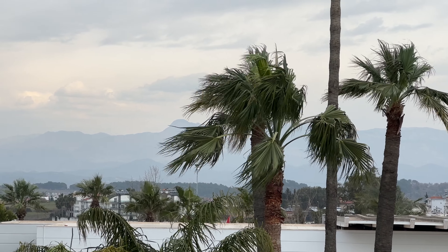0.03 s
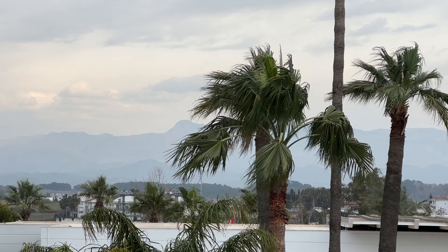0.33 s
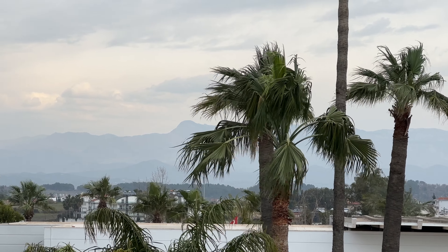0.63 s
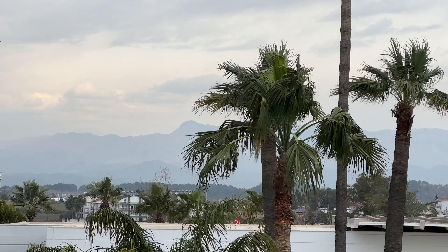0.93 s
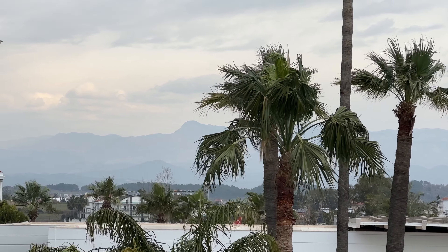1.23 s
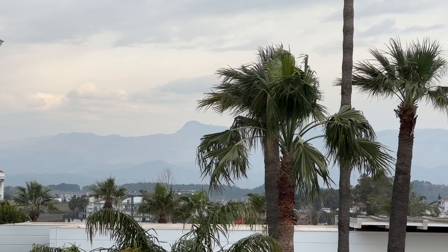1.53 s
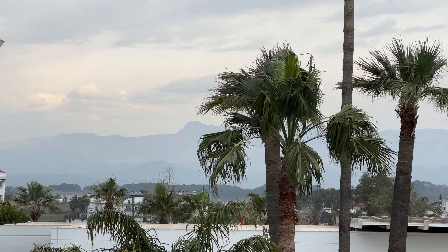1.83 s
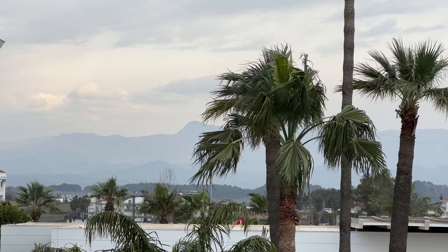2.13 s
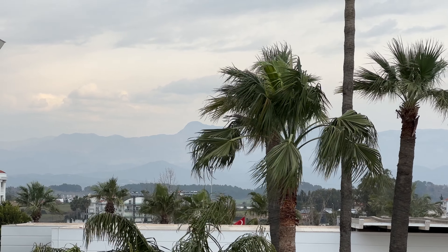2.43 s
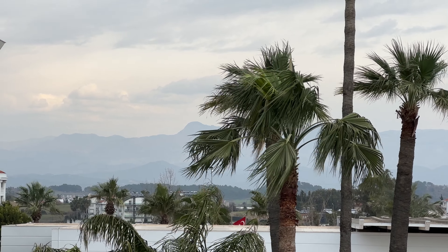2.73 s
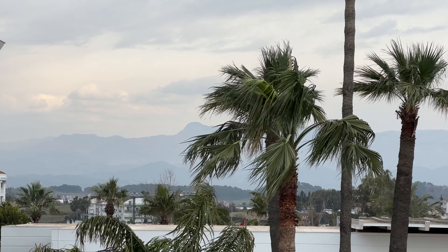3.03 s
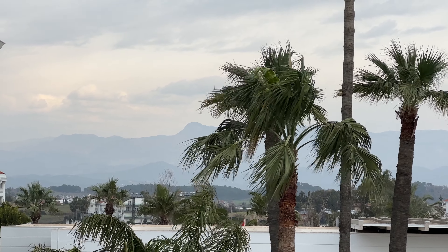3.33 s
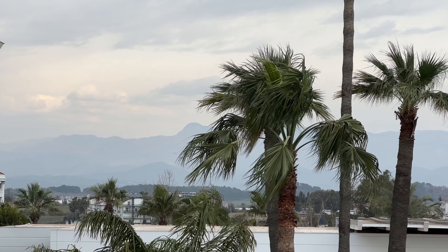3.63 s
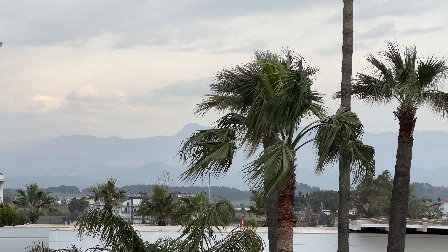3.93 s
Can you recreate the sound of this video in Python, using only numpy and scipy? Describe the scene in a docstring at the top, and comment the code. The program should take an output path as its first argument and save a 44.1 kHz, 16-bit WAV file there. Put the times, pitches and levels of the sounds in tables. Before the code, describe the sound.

Gusty wind rumbles and thumps on the microphone over the steady hiss of palm leaves.

```python
"""Low thumps and a gusty rumble come first: strong wind strikes an outdoor stereo microphone.
Turbulent pressure on its ports makes the rumble and a rougher flutter, and single eddies
hit them as short thumps that drop quickly in pitch. Behind this, palm crowns rush with
a steady wide hiss, and their stiff leaf tips tick faintly against each other."""
import sys
import numpy as np
from scipy import signal
from scipy.fft import rfft, irfft
from scipy.io import wavfile
from scipy.ndimage import uniform_filter1d

SR = 44100
rng = np.random.default_rng(int(sys.argv[2]) if len(sys.argv) > 2 else 0)


def master_out(mix):
    """Clip the mix to full scale and print it as 16-bit PCM to the path in sys.argv[1]."""
    frames = np.transpose(np.atleast_2d(mix))
    ceiling = np.clip(frames, -1, 1)
    pcm = np.round(ceiling * 32767).astype(np.int16)
    wavfile.write(sys.argv[1], SR, pcm)


N = 176400
ANTIPHASE = np.array([[1], [-1]])  # left and right with opposite signs


def gain(db):
    """Amplitude ratio of a level in decibels."""
    return 10 ** (np.asarray(db) / 20)


def curve(table, column=1):
    """Linear interpolation of one table column over time."""
    rows = np.array(table)
    return np.interp(np.arange(N) / SR, rows[:, 0], rows[:, column])


def colour(x, spectrum):
    """Spectral shaping: x filtered by a curve of (frequency [Hz], level [dB]), at rms 1."""
    hz, db = np.array(sorted(spectrum)).T
    bin_hz = np.maximum(np.fft.rfftfreq(N, 1 / SR), 1)
    response = gain(np.interp(np.log(bin_hz), np.log(hz), db))
    shaped = irfft(rfft(x) * response, N)
    return shaped / np.std(shaped)


def noise(spectrum):
    """Filtered Gaussian noise at rms 1."""
    return colour(rng.standard_normal(N), spectrum)


def wander(rate_hz):
    """Random modulation: smoothed noise of spread 1 that changes about rate_hz times a second."""
    width = max(int(SR / rate_hz), 2)
    drift = rng.standard_normal(N)
    for _ in range(2):
        drift = uniform_filter1d(drift, width, mode="wrap")
    return drift / np.std(drift)


def add(out, start_s, sound):
    """Superposition: a short stereo sound is summed into out."""
    start = int(np.clip(start_s * SR, 0, N - 1))
    out[:, start:start + sound.shape[1]] += sound[:, :N - start]


# Spectrum of a leaf tap (frequency [Hz], relative level [dB])
TICK_SPECTRUM = [(800, -55), (2500, 0), (6500, 3), (8000, -9), (9500, -3), (12000, -22), (16000, -24)]


def leaf_ticks(ticks_per_s=40, scatter_db=4.5, decay_s=0.0057, level_db=-70):
    """Impact noise: leaf tips collide at random, each tap a burst that decays exponentially."""
    taps = (rng.random(N) < ticks_per_s / SR) * gain(scatter_db * rng.standard_normal(N))
    envelope = signal.lfilter([1], [1, -np.exp(-1 / (decay_s * SR))], taps)
    return gain(level_db) * colour(envelope * rng.standard_normal(N), TICK_SPECTRUM)


# Spectra of the rush: direct, diffuse, from trees on the left (frequency [Hz], relative level [dB])
DIRECT_SPECTRUM = [(100, 4.5), (400, 10), (700, 6.5), (1000, 4), (1400, 3), (2000, 0), (3600, -2.5),
                   (4300, -5.5), (4900, -8.5), (6200, -8), (8300, -7.5), (9400, -8), (10000, -13.5),
                   (10600, -21), (12000, -25), (15600, -24.5)]
DIFFUSE_SPECTRUM = [(100, 0), (400, 4.5), (750, 6), (1050, 0.5), (1400, -6), (2100, -27), (2900, -14.5),
                    (4500, -21.5), (5800, -38), (7400, -28), (8250, -58), (9200, -11), (10200, -27),
                    (11500, -50), (14500, -31)]
LEFT_TREES_SPECTRUM = [(300, -40), (700, -17), (1100, 4.5), (1500, -3), (2200, -53)]
# Envelope of the direct rush (time [s], level [dB])
RUSH_LEVEL = [(0, -48.5), (.5, -49), (.8, -48.1), (1.1, -49.5), (1.35, -49.7), (1.7, -47), (1.95, -47.5),
              (2.2, -49.5), (2.7, -47.5), (3.2, -49), (3.6, -48.5), (4, -48)]


def fronds(flicker_db=0.64, swell_db=0.43, diffuse_db=-54.5, left_trees_db=-58.5):
    """Flow noise in palm crowns: each octave flickers by itself, and the whole rush swells together."""
    spectrum = rfft(noise(DIRECT_SPECTRUM))
    octave = np.log2(np.clip(np.fft.rfftfreq(N, 1 / SR), 500, 16000) / 500)
    direct = np.zeros(N)
    for centre in range(6):
        band = irfft(spectrum * np.maximum(1 - abs(octave - centre), 0), N)
        direct += band * gain(flicker_db * wander(rate_hz=12))
    diffuse = ANTIPHASE * gain(diffuse_db) * noise(DIFFUSE_SPECTRUM)
    rush = direct * gain(curve(RUSH_LEVEL)) + diffuse
    rush[0] += gain(left_trees_db) * noise(LEFT_TREES_SPECTRUM)
    return rush * gain(swell_db * wander(rate_hz=2.1))


# Spectra of the turbulent pressure (frequency [Hz], relative level [dB])
RUMBLE_SPECTRUM = [(15, -41), (30, -18), (45, -5), (65, 2.5), (95, -7.5), (130, -9), (200, -15.5),
                   (400, -30.5), (900, -111)]
FLUTTER_SPECTRUM = [(80, 3.5), (160, -6), (280, 0), (450, -5), (700, -6.5), (1000, -17.5), (1600, -26),
                    (3000, -68)]
# Wind at the microphone
# (time [s], relative rumble level [dB], relative flutter level [dB], typical small-eddy pitch [Hz])
GUSTS = [(0, -37.5, -40.5, 406), (.1, -30, -46, 398), (.24, -30.5, -43.5, 402), (.37, -39, -40.5, 507),
         (.5, -34, -41, 550), (.7, -35, -40.5, 595), (.9, -39.5, -42.5, 786), (1.1, -37.5, -44, 875),
         (1.4, -38.5, -43, 1020), (1.6, -39, -44, 1160), (1.7, -38, -43, 1230), (1.8, -38.5, -44, 1130),
         (2.22, -42.5, -46.5, 1060), (2.6, -46.5, -45.5, 885), (2.9, -46, -52, 796), (3.1, -42, -45, 930),
         (3.45, -41, -43, 746), (3.65, -43, -44, 724), (4, -39, -47, 800)]


def buffeting(rumble_rough_db=1.5, flutter_rough_db=2.5):
    """Turbulent pressure, partly coherent at the two ports: a deep rumble and a rougher flutter."""
    rumble = noise(RUMBLE_SPECTRUM) + ANTIPHASE * gain(-11.5) * noise(RUMBLE_SPECTRUM)
    flutter = noise(FLUTTER_SPECTRUM) + ANTIPHASE * gain(-8.5) * noise(FLUTTER_SPECTRUM)
    rumble_db = curve(GUSTS, column=1) + 1.73 + rumble_rough_db * wander(rate_hz=14.3)
    flutter_db = curve(GUSTS, column=2) - 4.5 + flutter_rough_db * wander(rate_hz=56)
    return rumble * gain(rumble_db) + flutter * gain(flutter_db)


def eddy(start_hz, end_hz, period_growth=0.59, port_spread_rad=0.3):
    """A falling chirp: a pressure ripple whose period grows linearly meets the two ports out of step."""
    duration_s = (1 / end_hz - 1 / start_hz) / period_growth
    t = np.arange(int(duration_s * SR)) / SR
    log_fall = np.log1p(period_growth * start_hz * t)  # log of start pitch over present pitch
    phase = 2 * np.pi * (log_fall / period_growth + rng.random())
    port_offset = ANTIPHASE * port_spread_rad * rng.uniform(-1, 1)
    progress = log_fall / np.log(start_hz / end_hz)
    envelope = abs(np.sin(np.pi * progress ** 0.85)) ** 1.28  # peaks early, with soft ends
    return envelope * np.sin(phase + port_offset)


def small_eddies(eddies_per_s=65, above_flutter_db=6, scatter_db=2):
    """Fine-scale turbulence: many short ripples at random times follow the level of the flutter."""
    out = np.zeros((2, N))
    flutter_db, pitch_hz = curve(GUSTS, column=2), curve(GUSTS, column=3)
    for onset in rng.integers(N, size=int(eddies_per_s * N / SR)):
        start_hz = pitch_hz[onset] * 2 ** rng.uniform(-0.5, 0.5)
        level_db = flutter_db[onset] + above_flutter_db + rng.uniform(-scatter_db, scatter_db)
        add(out, onset / SR, gain(level_db) * eddy(start_hz, start_hz / 5))
    return out


# Strong eddies at the ports (time [s], relative peak level [dB], start pitch [Hz], end pitch [Hz])
STRONG_EDDIES = [(.015, -28, 226, 38), (.043, -23, 149, 36), (.051, -32, 597, 43), (.089, -23, 760, 60),
                 (.094, -19.5, 145, 35), (.132, -25.5, 219, 47), (.159, -22, 149, 36),
                 (.174, -28.5, 520, 58), (.275, -14.5, 402, 40), (.288, -13.5, 150, 37.5),
                 (.337, -23, 300, 87), (.43, -29.5, 453, 75), (.452, -28, 520, 173),
                 (.542, -23.5, 950, 130), (.551, -21, 690, 114), (.642, -27, 299, 100),
                 (.663, -24.5, 597, 142), (.672, -22.5, 300, 62), (.774, -28.5, 394, 94),
                 (.788, -27.5, 650, 142), (.886, -31.5, 715, 163), (.898, -36, 1000, 200),
                 (1.005, -34, 800, 180), (1.017, -26, 497, 151), (1.026, -26, 895, 216),
                 (1.076, -33, 788, 88), (1.081, -27.5, 840, 250), (1.097, -29, 905, 216),
                 (1.163, -27.5, 520, 87), (1.208, -22, 1120, 172), (1.249, -38, 1690, 300),
                 (1.299, -35, 900, 230), (1.345, -26, 940, 139), (1.374, -23.5, 197, 66),
                 (1.416, -31.5, 1040, 116), (1.43, -28.5, 653, 199), (1.593, -28.5, 1195, 284),
                 (1.649, -34, 1000, 150), (1.662, -36, 1372, 457), (1.667, -29.5, 686, 163),
                 (1.678, -27.5, 1030, 248), (1.684, -26.5, 149, 36), (1.694, -36, 1500, 263),
                 (1.731, -26, 1220, 171), (1.826, -25.5, 240, 65), (1.845, -36, 1100, 250),
                 (1.927, -27.5, 1040, 248), (2.023, -31.5, 1100, 260), (2.099, -36.5, 1060, 300),
                 (2.183, -30, 945, 302), (2.2, -32, 141, 42), (2.257, -31.5, 200, 60),
                 (2.358, -29, 900, 340), (2.368, -31, 131, 40), (2.455, -30.5, 300, 96),
                 (2.498, -32.5, 1450, 400), (2.711, -30.5, 1100, 130), (2.717, -33, 170, 50.6),
                 (2.818, -35, 700, 80), (3.015, -32.5, 403, 91), (3.107, -32.5, 1210, 284),
                 (3.119, -29, 150, 42), (3.172, -29.5, 1020, 170), (3.316, -28, 1000, 340),
                 (3.452, -27, 557, 173), (3.464, -21.5, 150, 45.2), (3.615, -30, 200, 45),
                 (3.732, -37, 131, 40), (3.808, -29, 159, 45), (3.863, -27.5, 1100, 347)]


def strong_eddies(boost_db=0.5):
    """Pressure transients: each strong eddy hits the ports as one thump of falling pitch."""
    out = np.zeros((2, N))
    for start_s, peak_db, start_hz, end_hz in STRONG_EDDIES:
        add(out, start_s, gain(peak_db + boost_db) * eddy(start_hz, end_hz))
    return out


def scene():
    """Superposition of the distant trees and the wind on the microphone."""
    trees = fronds() + leaf_ticks()
    return trees + buffeting() + strong_eddies() + small_eddies()


# Phase response of the microphone pair (frequency [Hz], lead of left over right [rad])
PHASE_LEAD = [(20, -0.5), (100, -0.46), (350, -0.27), (550, -0.4), (780, -1.2), (1050, -.45), (2100, 0),
              (3300, 0.64), (4400, .5), (5300, 0), (6500, 0), (7400, 1.55), (7950, 3), (8550, 3.5),
              (9200, 1.5), (10100, 0.97), (10500, 0), (13500, 0), (15600, -2.6)]


def record(dry):
    """Phase shift and band limiting: the pair offsets left from right; the recorder cuts both extremes."""
    hz, lead_rad = np.array(sorted(PHASE_LEAD)).T
    angle = np.interp(np.fft.rfftfreq(2 * N, 1 / SR), hz, lead_rad)
    shifted = rfft(dry, 2 * N) * np.exp(0.5j * ANTIPHASE * angle)
    picked_up = irfft(shifted, 2 * N)[:, :N]
    bass_cut = signal.butter(3, 32, "high", fs=SR, output="sos")
    top_cut = signal.ellip(10, 0.2, 80, 15700, fs=SR, output="sos")
    return signal.sosfilt(top_cut, signal.sosfilt(bass_cut, picked_up))


dry = scene()
out = record(dry)
master_out(out)
```